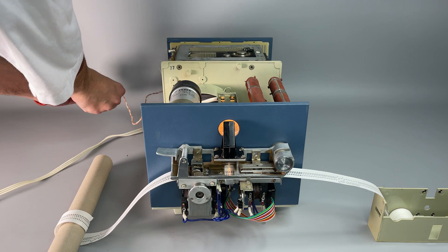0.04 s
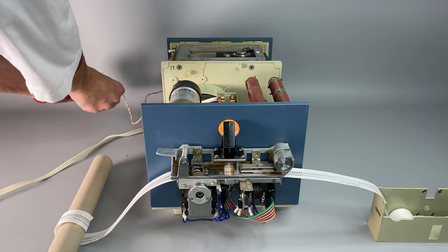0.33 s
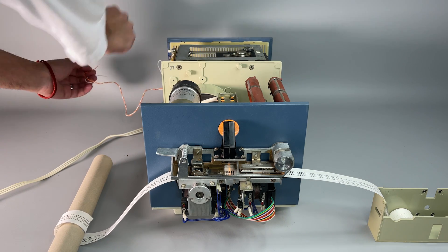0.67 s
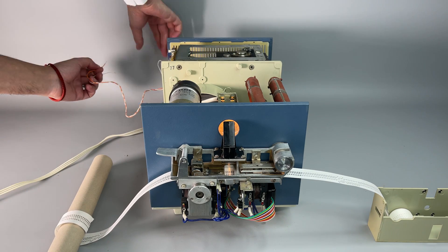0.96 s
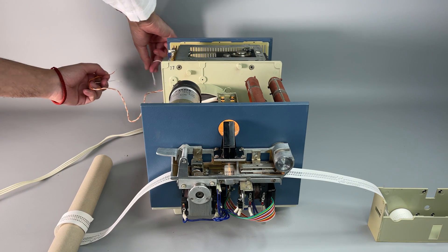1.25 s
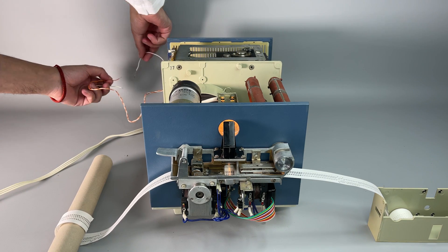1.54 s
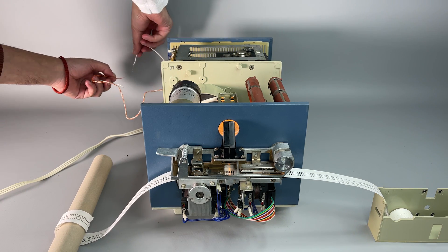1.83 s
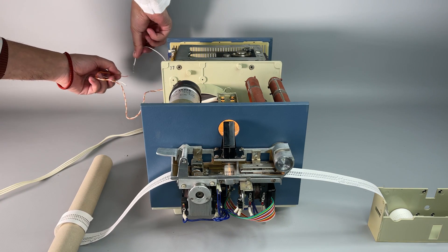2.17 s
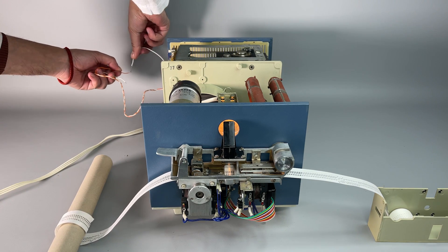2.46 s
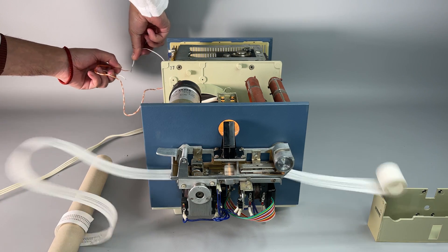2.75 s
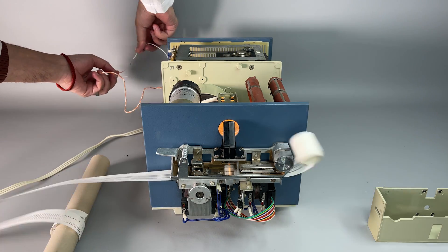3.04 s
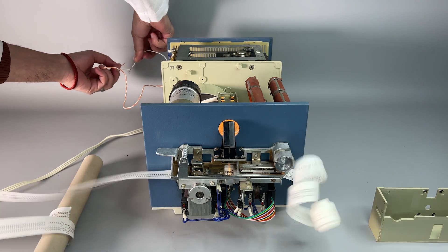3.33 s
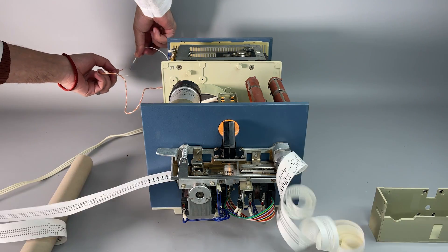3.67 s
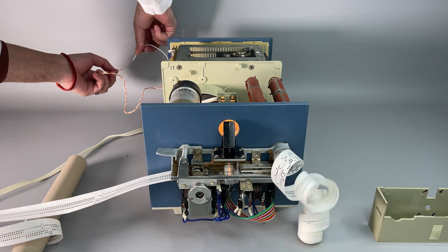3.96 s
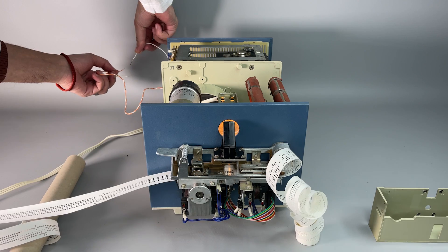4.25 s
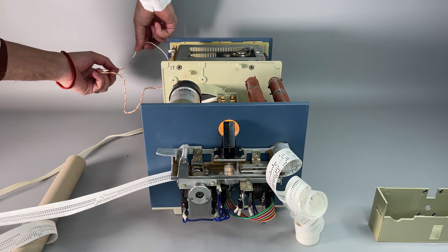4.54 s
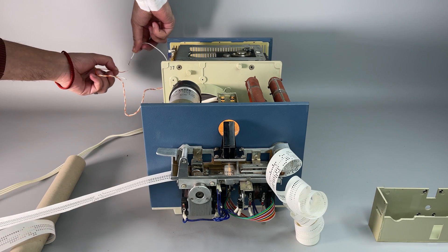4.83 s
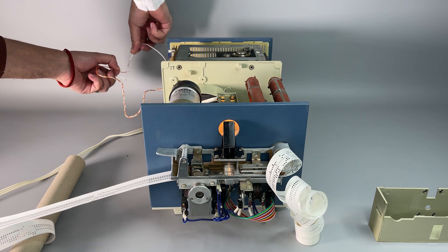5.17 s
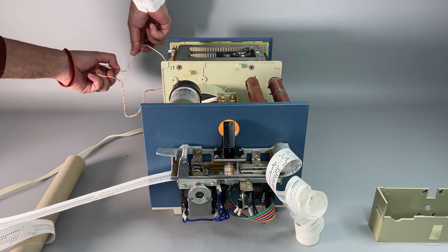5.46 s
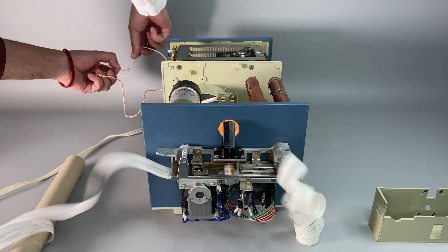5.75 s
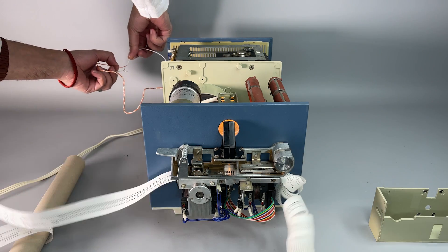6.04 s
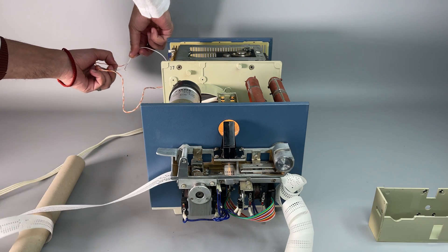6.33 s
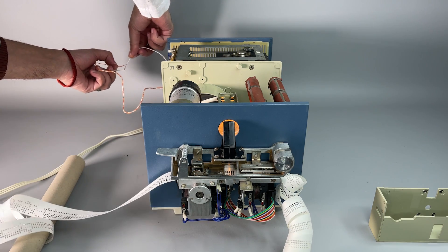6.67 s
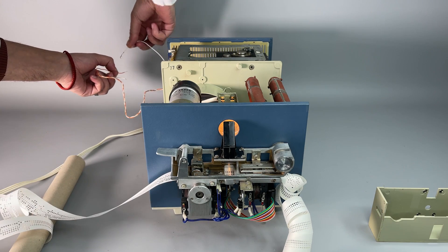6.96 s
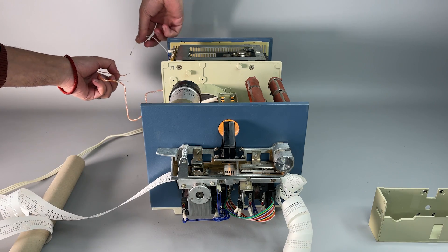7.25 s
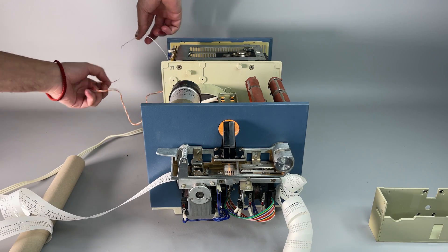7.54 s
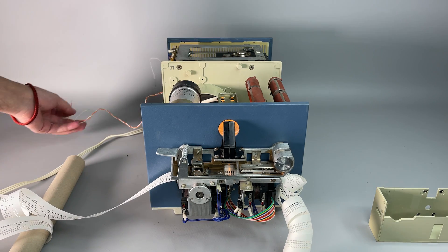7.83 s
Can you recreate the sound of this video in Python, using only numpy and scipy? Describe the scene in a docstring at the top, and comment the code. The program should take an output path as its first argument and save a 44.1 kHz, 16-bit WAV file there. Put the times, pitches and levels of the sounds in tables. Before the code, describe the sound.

Two brief, loud rushes of paper tape and metallic clacks interrupt a machine's steady motor whine and fan hum.

```python
"""A small room, a two-port stereo microphone close to a paper tape reader on a table.
The reader idles: its motor whines, the belt buzzes, a dry bearing scrapes, a fan rushes, a hum throbs.
Twice the pinch roller grips and the tape hisses through the guides, dragging on the motor.
The first run ends on the brake's clack; in the second the tape runs out, and the roller whirs
on the bare capstan until it is released."""
import sys
import numpy as np
from scipy import signal
from scipy.fft import rfft, irfft, next_fast_len
from scipy.io import wavfile
from scipy.ndimage import uniform_filter1d, map_coordinates

SR = 44100
rng = np.random.default_rng(int(sys.argv[2]) if len(sys.argv) > 2 else 0)


def generate_wav(signal):
    """Clip the signal to [-1, 1] and save it as 16-bit WAV at the path in sys.argv[1]."""
    frames = np.transpose(np.atleast_2d(signal))
    scaled = np.clip(frames, -1, 1) * 32767
    pcm = np.round(scaled).astype(np.int16)
    wavfile.write(sys.argv[1], SR, pcm)


N = 357210
T = np.arange(N) / SR
FFT_SIZE = next_fast_len(N, True)
HZ = np.fft.rfftfreq(FFT_SIZE, 1 / SR)

# decay of the room: f/Hz, t60/s
ROOM_DECAY = [(300, 0.73), (2000, 0.4), (6000, 0.26), (14000, 0.15)]
# noise spectra: f/Hz, relative level/dB per Hz
FAN_SPECTRUM = [(28, -106), (50, -76), (75, -76), (110, -71.5), (195, -73), (265, -64), (340, -70),
                (400, -66), (520, -69), (760, -62), (1020, -65), (1500, -75.5), (2000, -80.5), (2650, -74),
                (3350, -84), (4200, -80), (5500, -83), (9500, -83), (14000, -104)]
BELT_SPECTRUM = [(200, -81), (400, -76.5), (600, -75), (950, -72.5), (1250, -74), (1500, -76), (1950, -82),
                 (2400, -76), (2700, -72), (3000, -77), (3350, -87), (3900, -79), (4300, -84), (4600, -85),
                 (5400, -84), (7000, -87), (12000, -105)]
ROLLER_SPECTRUM = [(600, -90), (1000, -82), (1550, -72), (1900, -81.5), (2400, -62), (2700, -79.5),
                   (3200, -65.5), (3800, -78), (4600, -78), (6000, -80), (12000, -98)]
PAPER_SPECTRUM = [(300, -74.5), (900, -73), (1500, -73.5), (2000, -77), (2500, -74), (3300, -67),
                  (4800, -70.5), (5500, -70.5), (6700, -71.5), (9000, -63), (12000, -72), (16000, -110)]
PUNCHED_EDGE_SPECTRUM = [(5000, -100), (7300, -108), (7750, -55), (8400, -67.5), (9300, -56), (9700, -60.5),
                         (10800, -57.5), (12000, -71), (13000, -74), (16000, -69)]
# bearing resonances: f/Hz, width/Hz, relative level/dB per Hz, swell/dB, first crest/s, drift/dB per s
BEARING_MODES = [(4270, 70, -78, 1.5, 0.4, 0), (4900, 90, -71, 1.5, 0.3, 0), (6380, 130, -81, 2, 0.6, 0),
                 (6720, 110, -79.5, 2, 0.2, 0), (7770, 300, -72.5, 1.5, 0.65, -0.5),
                 (9230, 150, -71, 3.5, 0.17, 0.3), (9400, 140, -68.5, 2.5, 0.62, 0),
                 (9610, 200, -75.5, 2, 0.32, 0.5), (10130, 300, -75, 0, 0, 0), (10500, 1800, -81, 0, 0, 0),
                 (11640, 160, -82, 3, 0.6, -0.5), (11820, 160, -80.5, 3, 0.27, 0)]
# tones of turning parts: multiple of the turning rate, relative level/dB
MOTOR_TONES = [(2, -53.5), (3, -46.5), (5, -55.5), (6, -46), (8, -52), (9, -56), (12, -45), (15, -51),
               (18, -66), (20, -54), (21, -51), (22, -55.5), (24, -51.5), (28, -55), (31, -62), (44, -62)]
PULLEY_TONES = [(11, -58), (20, -48), (46, -59), (49, -52.5), (51, -47.5), (54, -47), (55, -47), (56, -55),
                (60, -56), (64, -53), (87, -63)]
BARE_ROLLER_TONES = [(28, -54), (40, -56), (47, -58), (63, -49), (68, -52), (73, -54), (86, -60)]
STRAINED_BELT_TONES = [(51, -45), (56, -53)]
# swelling belt tones: multiple, relative level/dB, depth/0-1, swell rate/Hz, first crest/s, waver/0-1
SWELLING_BELT_TONES = [(21, -43.3, 0.2, 2.01, 0.22, 0.32), (26, -48, 0.4, 2.51, 0.027, 0.2),
                       (59, -45.7, 0.26, 1.2, 0.28, 0.4)]
# runs of tape: roller grips/s, tape ends/s, roller lifts/s, tape/dB, roller/dB, slither fade/s
TAPE_RUNS = [(2.721, 3.352, 3.352, -1.05, -3.5, 0.15), (5.775, 5.899, 6.298, -0.5, -7.5, 0.049)]
# the idling sound dips as each run of tape ends: t/s, change/dB
IDLE_DIPS = [(3.352, -4), (5.897, -1.5)]
# the loose coil jumps, tumbles over the table and flutters: start/s, end/s, level/dB
COIL_RUSTLES = [(2.962, 3.04, -8.5), (3.492, 3.798, -21), (5.925, 6.188, -20.5)]
# resonances of the deck under the tape: f/Hz, width/Hz, lift before emphasis/dB
DECK_MODES = [(1590, 110, 8.5), (2415, 110, 12), (2680, 90, 8), (3230, 200, 6.3), (3500, 70, 4.5),
              (3850, 89, 5.5), (4300, 120, 7.5), (4610, 89, 6.5), (4880, 180, 7.5), (6020, 120, 7),
              (7050, 130, 4.5)]
# clacks of roller and brake, snaps of the tape:
# t/s, click/dB, chassis ring/dB, loose parts/dB, pitch ratio of the click, change per bounce/dB
STRIKES = [(2.72, -29, -33, -36, 1, -8), (2.911, -9, -50, -48, 1, -4), (2.990, -12, -45, -38, 0.94, -8),
           (3.031, -11, -48, -46, 1.05, -8), (3.223, -4, -42, -38, 1.03, -5),
           (3.352, -2, -28, -19, 0.96, -4), (3.768, -32, -60, -58, 0.88, -8),
           (5.7773, -11, -38, -32, 1, -0.5), (5.799, -7, -36, -33, 1.09, -2),
           (5.873, -13, -33, -35, 0.81, -9), (5.8932, -12, -30, -29, 1, -5),
           (6.2988, -2, -20, -16, 1.03, -6)]
# modes of the steel armature and of the chassis: f/Hz, relative level/dB, t60/s
ARMATURE_MODES = [(8160, -12, 0.0044), (8390, -3, 0.0064), (8620, -3, 0.0044), (8770, -4, 0.01),
                  (10300, -3, 0.0049)]
CHASSIS_MODES = [(996, -6, 0.08), (1100, -6, 0.066), (1273, -9, 0.14), (1585, -16, 0.2), (1810, -10, 0.15),
                 (1880, -10.5, 0.13), (2244, -5.5, 0.079), (2350, -6.5, 0.088), (2730, -22, 0.06),
                 (2900, -17, 0.11), (3470, -4, 0.032), (4090, -4, 0.032), (6000, -8, 0.05),
                 (6520, -7, 0.07), (6800, -10, 0.053)]
# how alike noise arrives at the microphone's two ports: f/Hz, likeness/0-1
PORT_LIKENESS = [(100, 1), (700, 0.61), (1500, 0.41), (2600, 0.62), (4000, 0.67), (5500, 0.26), (6800, 0.2),
                 (8000, 1), (11000, 1)]
# left port over right: f/Hz, level/dB
PORT_LEVEL = [(50, 0), (100, -3.5), (300, -1.5), (600, 0.5), (786, 4.5), (1000, 0), (2000, 0), (3200, 0.5),
              (4300, 4.5), (7400, 3), (8500, 2), (10000, 0)]
# left port ahead of right: f/Hz, phase/rad
PORT_LEAD = [(800, -.1), (2000, .2), (2900, 1), (5000, .9), (6600, 0), (7500, 1.25), (8700, 0),
             (10250, -3.14), (11800, -6.28), (12500, -6.28), (13900, -9.42), (15000, -12.57)]
# the sound dulls above 13 kHz: f/Hz, level/dB
TREBLE_ROLL_OFF = [(11500, 1), (13000, 1), (16000, -17)]

BELT_RATIO = 0.9908  # pulley turns per motor turn
INERTIA_S = 0.019  # the motor's lag behind a load


def amp(db):
    """Decibels to gain."""
    return 10 ** (np.asarray(db) / 20)


def curve(points, hz=HZ):
    """A table over frequency, joined on a log axis."""
    f, value = np.transpose(points)
    return np.interp(np.log(hz + 1), np.log(f), value)


def wander(hz):
    """Random drift of rms 1, up to about hz."""
    x = irfft(rfft(rng.standard_normal(FFT_SIZE)) / (1 + (HZ / hz) ** 4))[:N]
    return x / x.std()


def white():
    """Two unrelated noises."""
    return rng.standard_normal((2, N))


def gate(start, end, rise_s, fall_s):
    """Rises towards 1 from start and dies away after end."""
    risen = 1 - np.exp(-np.maximum(np.minimum(T, end) - start, 0) / rise_s)
    return risen * np.exp(-np.maximum(T - end, 0) / fall_s)


def surface(turns, size=896):
    """Two tracks of roughness on a turning part: the same bumps pass on every turn."""
    bins = size // 2 + 1
    phases = np.exp(2j * np.pi * rng.random((2, bins)))
    bumps = irfft(phases * rng.uniform(0.66, 0.85, bins), size * 8)
    return np.array([np.interp(turns % 1, np.linspace(0, 1, len(b)), b / b.std()) for b in bumps])


def colour(pair, gain):
    """Gives two unrelated drives a spectrum (gain per root Hz) and the likeness of the two ports."""
    left, other = rfft(pair, FFT_SIZE)
    likeness = np.clip(curve(PORT_LIKENESS), 0, 1)
    right = likeness * left + np.sqrt(1 - likeness ** 2) * other
    return irfft(np.array([left, right]) * gain)[:, :N] * np.sqrt(SR / 2)


def sine(cycles):
    """A sine of rms 1."""
    return np.sqrt(2) * np.sin(2 * np.pi * cycles)


def tones(turns, orders, waver):
    """Tones at multiples of a turning rate, each wavering in level."""
    drifts = [wander(3.5) for _ in range(5)]
    return sum(amp(db) * (1 + waver * drifts[i % len(drifts)]) * sine(order * turns + rng.random())
               for i, (order, db) in enumerate(orders))


def ring(modes, t):
    """Struck modes dying away over the times t."""
    return sum(amp(db - 60 * t / t60) * np.sin(2 * np.pi * hz * t) for hz, db, t60 in modes)


def room(sound):
    """Dense reflections off the near walls, each band dying at its own speed."""
    taps = rng.standard_normal((2, SR // 2)) * (rng.random((2, SR // 2)) < .1) * (T[:SR // 2] > .003)
    hz, t, bands = signal.stft(taps, SR, nperseg=256)
    decay = amp(-60 * t / curve(ROOM_DECAY, hz)[:, None])
    _, tail = signal.istft(bands * decay, SR, nperseg=256)
    return signal.fftconvolve(sound, tail / np.linalg.norm(tail[0]), axes=1)[:, :N]


def fan():
    """A steady rush of air behind everything else."""
    return colour(white() * amp(.5 * wander(3.6)), amp(curve(FAN_SPECTRUM)))


def hum(first_s=0.128, period_s=0.4805, low_hz=48.2, chirp_hz=156, chirp_s=0.0165, mains_hz=50):
    """About twice a second a low tone chirps down and fades; the mains octave dips as it passes."""
    since = (T - first_s) % period_s
    edges = np.clip(np.minimum(since, period_s - since) / 0.0028, 0, 1)
    cycles = low_hz * since + chirp_hz * chirp_s * (1 - np.exp(-since / chirp_s))
    throb = edges * amp(-40 - 13 * since / period_s) * sine(cycles)
    dip = np.exp(-((since - chirp_s) / 0.008) ** 2)
    return throb + amp(-39 - 8 * dip) * sine(2 * mains_hz * T)


def bearing(turns, swing_db=5.5, cycle_s=0.64, eased_db=-4):
    """A dry spot scrapes once a turn and rings high resonances, which swell one after another."""
    contact = amp(swing_db * np.cos(2 * np.pi * turns) + 0.99 * wander(28))
    scrape = contact * (surface(turns) + .5 * white())
    scrape /= scrape.std()
    squeal = 0
    for hz, width, db, swell_db, crest, drift in BEARING_MODES:
        resonance = amp(db) / (1 + ((HZ - hz) / width) ** 2) ** 2
        change_db = swell_db * np.cos(2 * np.pi * (T - crest) / cycle_s) + drift * (T - T.mean())
        squeal += colour(scrape, resonance) * amp(change_db)
    (_, braked, *_), (_, _, released, *_) = TAPE_RUNS
    eased = gate(braked, released, INERTIA_S, INERTIA_S)
    return squeal * amp(-2 + eased_db * eased)


def belt(turns, bare, bare_db=-5, fade_db_per_s=0.33):
    """The pulley sings, the belt's buzz slowly fades, and its swelling tones weaken under a bare roller."""
    pulley_turns = turns * BELT_RATIO
    pulley = tones(pulley_turns, PULLEY_TONES, waver=0.4)
    swelling = 0
    for order, db, depth, rate, crest, waver in SWELLING_BELT_TONES:
        swell = 1 + depth * np.cos(2 * np.pi * rate * (T - crest))
        swelling += swell * tones(pulley_turns, [(order, db)], waver)
    roughness = (surface(turns) + surface(pulley_turns)) / np.sqrt(2)
    buzz = colour(roughness, amp(curve(BELT_SPECTRUM))) * amp(2 - fade_db_per_s * T + 0.8 * wander(9.7))
    return pulley + swelling * amp(bare_db * bare) + buzz


def motor(turns, pulling, bare, whine_order=16, overtone_order=28, settle_s=1.5):
    """A slot whine that follows the load, shaft tones, and a thin overtone that sings, then settles."""
    whine_db = -25.5 + 1.5 * pulling - 2 * bare + 0.44 * wander(18)
    whine = amp(whine_db) * sine(whine_order * turns)
    overtone = amp(-56 + 13.5 * np.exp(-T / settle_s)) * sine(overtone_order * turns)
    return whine + tones(turns, MOTOR_TONES, waver=0.15) + overtone


def roller(turns, bare, press_s=0.0033):
    """The pinch roller rubs softly on the capstan; with no tape between it whirs and strains the belt."""
    pressed = sum(amp(db) * gate(grip, lift, press_s, press_s) for grip, _, lift, _, db, _ in TAPE_RUNS)
    rub = colour(pressed * (.5 * surface(turns) + white()), amp(curve(ROLLER_SPECTRUM)))
    whir = tones(turns, BARE_ROLLER_TONES, waver=0.25)
    strain = tones(turns * BELT_RATIO, STRAINED_BELT_TONES, waver=0.25)
    return rub + bare * (whir + strain)


def clacks(bounces=3, bounce_s=0.0018, crack_s=0.0021, knock_s=0.011, rattle_s=0.046):
    """The armature strikes and bounces (clicks); the chassis rings and loose parts rattle (knocks)."""
    t, clicks, knocks = T[:SR // 4], np.zeros(N), np.zeros(N)
    knock_band = signal.butter(2, [950, 2700], "band", fs=SR, output="sos")
    low_cut = signal.butter(2, 900, "high", fs=SR, output="sos")  # small parts radiate no bass
    attack = 1 - np.exp(-t / 0.00053)
    fading = np.exp(-t / knock_s) + amp(-15.5) * np.exp(-t / rattle_s)
    for start, click_db, chassis_db, loose_db, pitch, bounce_db in STRIKES:
        rattle = amp(loose_db) * signal.sosfilt(knock_band, rng.standard_normal(len(t))) * fading
        chassis = amp(chassis_db) * ring(CHASSIS_MODES, t)
        knocks += np.interp(T - start, t, (chassis + rattle) * attack, 0, 0)
        armature = ring(ARMATURE_MODES, t * pitch)
        for k in range(bounces):
            crack = amp(-13) * rng.standard_normal(len(t)) * np.exp(-t / crack_s)
            strike = amp(click_db + k * bounce_db) * (armature + crack) * attack
            clicks[round((start + k * bounce_s) * SR):][:len(t)] += strike
    return signal.sosfilt(low_cut, [clicks, knocks])


def deck(emphasis=1.35):
    """Gain over frequency of the resonant deck that the tape rubs on."""
    lift_db = sum(db / (1 + (2 * (HZ - hz) / width) ** 2) for hz, width, db in DECK_MODES)
    return amp(emphasis * lift_db)


def tension_flutter(rasp, depth=0.005, hz=18):
    """The tape's tension flutters and bends the pitch of its rasp."""
    slip = np.cumsum(depth * wander(hz))
    position = np.arange(N) + slip - uniform_filter1d(slip, SR // 4)
    return np.array([map_coordinates(side, [position], order=3) for side in rasp])


def tape(turns, pulling, rise_s=0.0044, stop_s=0.0075, growth_db_per_s=8):
    """Paper rubs through the guides; its punched edge sizzles in clumps, more as the coil unwinds."""
    moving = slither = 0
    for grip, end, _, db, _, fade_s in TAPE_RUNS:
        moving += amp(db) * gate(grip, end, rise_s, stop_s)
        slither += amp(db - 7) * gate(grip, end, rise_s, fade_s)  # lingers after the run
    rustle = sum(amp(db) * gate(start, end, rise_s=0.0076, fall_s=0.13) for start, end, db in COIL_RUSTLES)
    unwound_s = np.cumsum(pulling) / SR
    edge = np.hypot(moving * amp(-9 + growth_db_per_s * unwound_s), rustle)
    rub = (white() + 0.13 * surface(turns)) * np.maximum(moving, slither) * amp(0.9 * wander(280))
    sizzle = white() * edge * amp(1.9 * wander(45) + 3 * wander(830))  # flapping and fine grain
    rasp = colour(rub, amp(curve(PAPER_SPECTRUM)) * deck())
    return tension_flutter(rasp) + colour(sizzle, amp(curve(PUNCHED_EDGE_SPECTRUM)))


def loads(jolt_s=0.028):
    """Drags on the motor, each 0-1: the moving tape, the roller running bare, the jolt of the grip."""
    pulling = bare = jolt = 0
    for grip, end, lift, *_ in TAPE_RUNS:
        pulling += gate(grip, end, INERTIA_S, INERTIA_S)
        bare += gate(end, lift, INERTIA_S, INERTIA_S)
        jolt += gate(grip, grip + jolt_s, INERTIA_S, INERTIA_S)
    return pulling, bare, jolt


def scene(free_hz=49.175):
    """The reader from close by: its shaft sags under load; tape, roller and clacks stir the room."""
    pulling, bare, jolt = loads()
    shaft_hz = free_hz - 0.16 * pulling - 0.98 * bare - 0.95 * jolt + .025 * wander(6)
    turns = np.cumsum(shaft_hz) / SR
    dip_db = sum(db * gate(start, start + 0.11, rise_s=0.0031, fall_s=0.12) for start, db in IDLE_DIPS)
    idle = fan() + hum() + bearing(turns) + belt(turns, bare) + motor(turns, pulling, bare)
    run = roller(turns, bare) + tape(turns, pulling)
    clicks, knocks = clacks()
    reflections = room(amp(-16) * run + amp(-7) * clicks + amp(-4) * knocks)
    return idle * amp(-3.5 + dip_db) + run + clicks + knocks + reflections


def record(dry, limit_hz=15900):
    """The two ports differ in level and phase. The sound dulls above 13 kHz and stops near 16 kHz."""
    left = amp(curve(PORT_LEVEL) / 2) * np.exp(.5j * curve(PORT_LEAD))
    response = amp(curve(TREBLE_ROLL_OFF)) * np.array([left, 1 / left])
    ports = irfft(rfft(dry, FFT_SIZE) * response)[:, :N]
    low_pass = signal.firwin(511, limit_hz, window=("kaiser", 9), fs=SR)
    return signal.oaconvolve(ports, low_pass[None], "same")


dry = scene()
out = record(dry)
generate_wav(out)
```